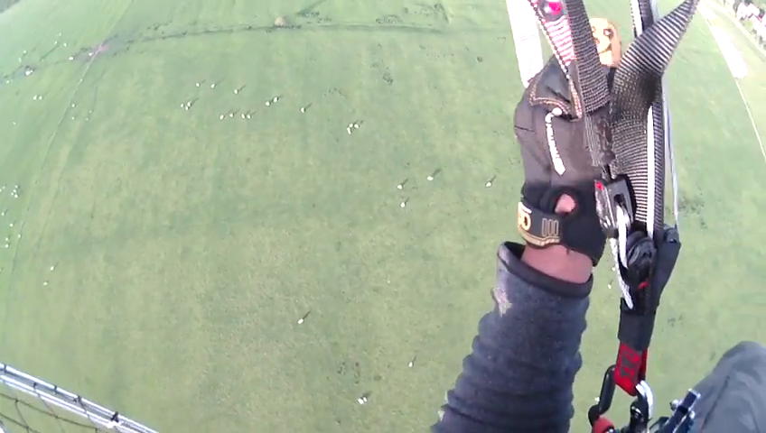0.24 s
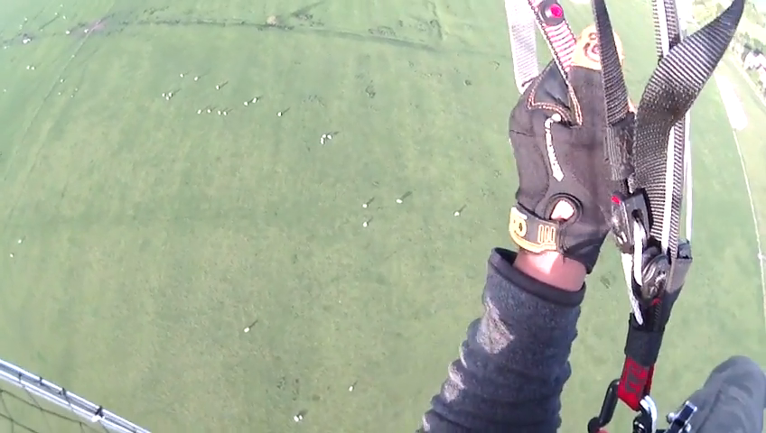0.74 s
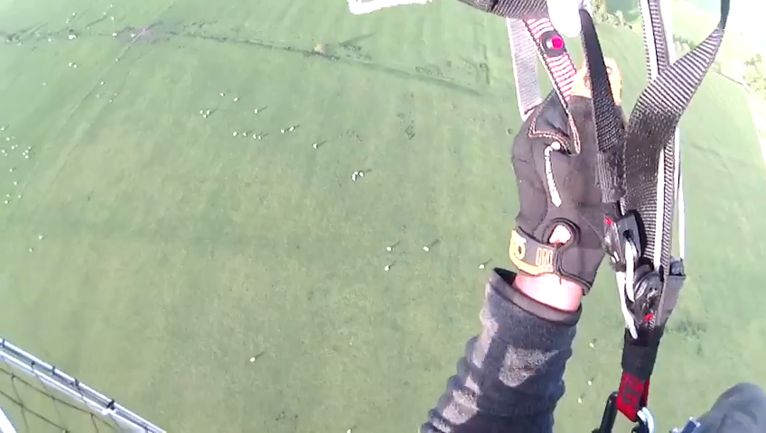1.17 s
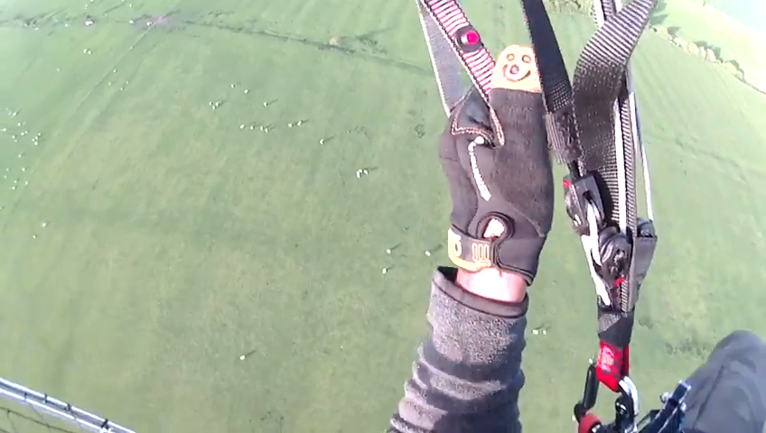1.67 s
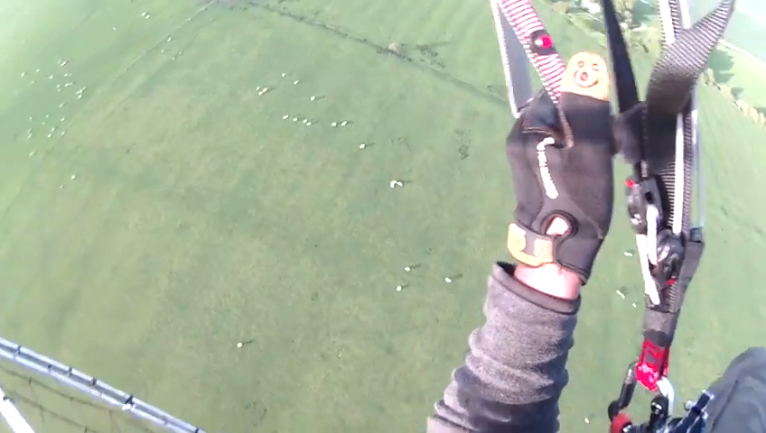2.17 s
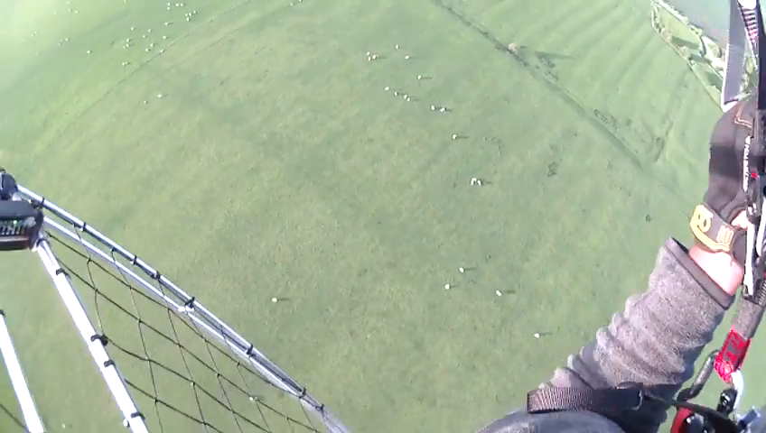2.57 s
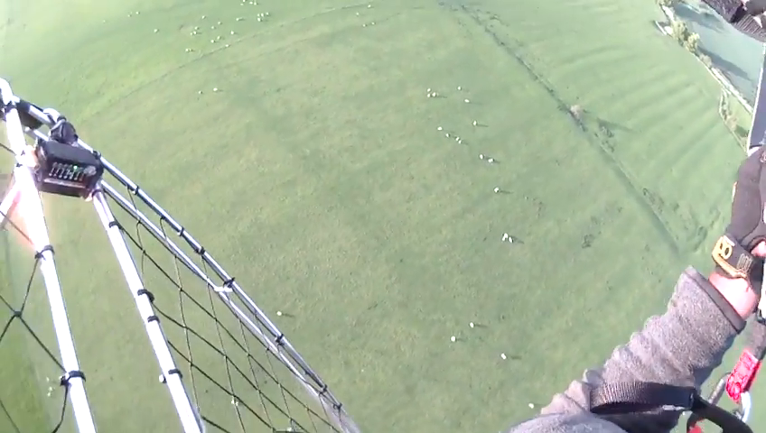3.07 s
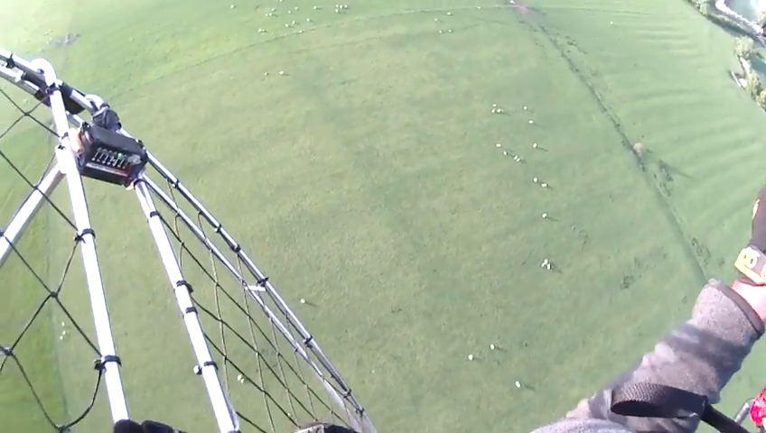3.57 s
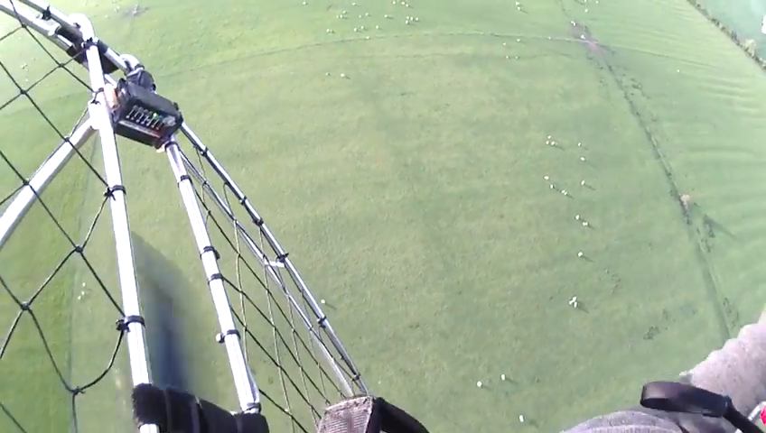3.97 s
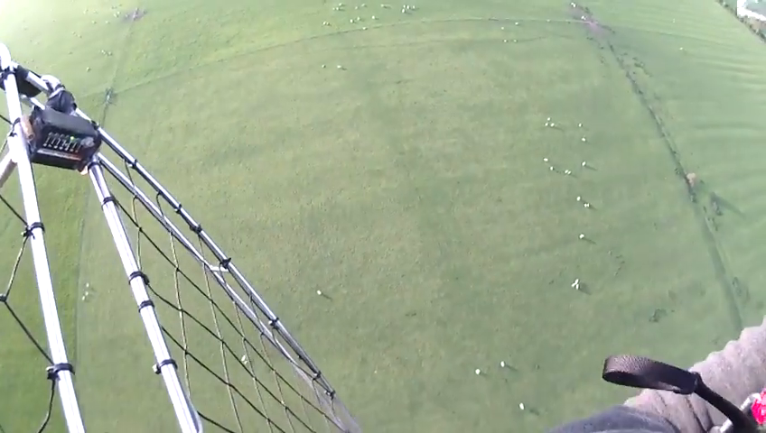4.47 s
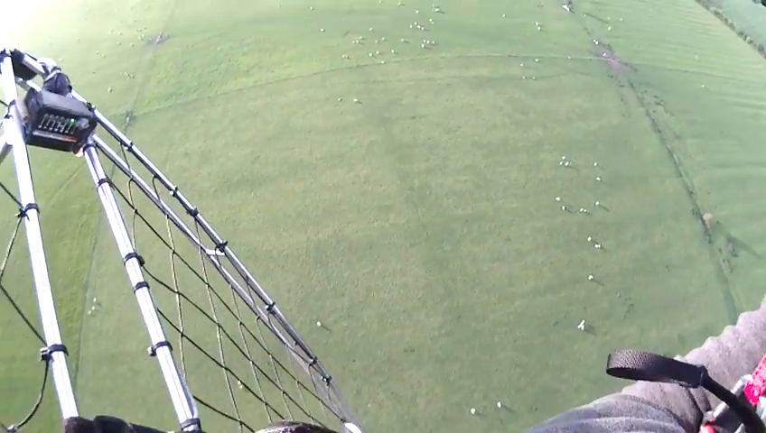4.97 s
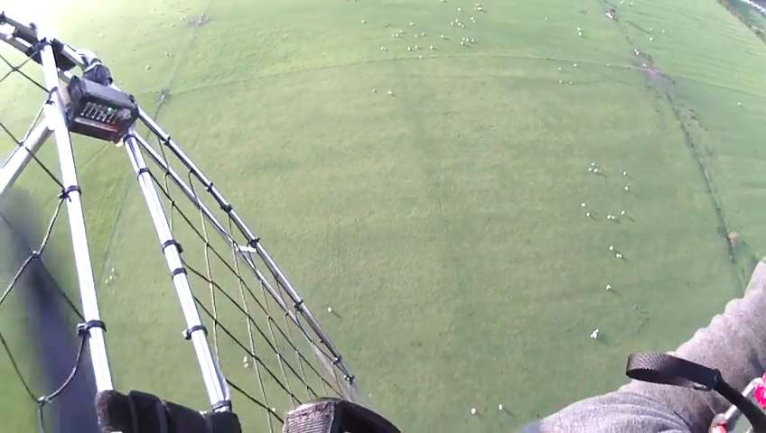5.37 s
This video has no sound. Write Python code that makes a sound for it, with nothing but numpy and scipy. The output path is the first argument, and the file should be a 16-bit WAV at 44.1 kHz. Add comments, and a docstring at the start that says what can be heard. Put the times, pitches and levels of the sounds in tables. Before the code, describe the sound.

Irregular, hollow engine pops with a near-constant high metal ring sputter over a fast throb, propeller wash and soft wind gusts.

```python
"""An idling engine's thin metal whine near 2 kHz and ringing exhaust pops, close up, over a throb and rushing air.
It is a paramotor's two-stroke in a glide: strong firings come two to thirteen turns apart, weaker turns between.
Combustion sets off a metal resonance and rattles the fins; a moment later the exhaust pulse leaves and its pipe rings.
The intake throb is a filtered pulse on every turn; propeller wash and gusts, strongest early, are coloured noise.
A faint treble hiss swells on each turn, and the strongest pops overload the microphone input."""
import sys
import numpy as np
from scipy import signal
from scipy.fft import rfft, irfft, next_fast_len
from scipy.io import wavfile
from scipy.ndimage import uniform_filter1d

SR = 44100
rng = np.random.default_rng(int(sys.argv[2]) if len(sys.argv) > 2 else 0)


def pcm_store(signal):
    """Save signal as 16-bit PCM."""
    levels = np.round(np.clip(np.atleast_2d(signal), -1, 1) * 32767)
    wavfile.write(sys.argv[1], SR, levels.astype(np.int16).T)


N = 247842
TIME = np.arange(N) / SR

# how openly the engine faces the microphone: time_s, bright_metal_gain_db
FACING_CURVE = [(0, -8), (2.2, -13), (2.8, -8), (3.3, 2), (4.0, 2), (4.7, -3.5), (5.6, -1)]
WHINE_LEAD_S = 0.0124   # combustion comes this long before the exhaust blast peaks


def from_db(db):
    """Decibels to gain."""
    return 10 ** (np.asarray(db) / 20)


def rms_one(x):
    """Scales a signal to rms 1."""
    return x / np.sqrt(np.mean(x ** 2) + 1e-20)


def in_time(curve):
    """Reads a curve of (time, value) points at every sample."""
    return np.interp(TIME, *np.transpose(curve))


def colour(x, spectrum):
    """Causal minimum-phase filter through the points of a spectrum, built by folding its cepstrum."""
    size = next_fast_len(len(x) + 8192)
    size += size % 2
    hz, level_db = np.transpose(spectrum)
    log_hz = np.log(np.fft.rfftfreq(size, 1 / SR) + 1)
    gain = from_db(np.interp(log_hz, np.log(hz), level_db))
    cepstrum = irfft(np.log(gain))
    cepstrum[1:size // 2] *= 2
    cepstrum[size // 2 + 1:] = 0
    response = np.exp(rfft(cepstrum))
    return irfft(rfft(x, size) * response)[:len(x)]


def noise(spectrum):
    """Steady coloured noise of rms 1."""
    return rms_one(colour(rng.standard_normal(N), spectrum))


def place(times, sounds):
    """Lays one short sound (a row) at each time; a second of margin at both ends is cut off."""
    out = np.zeros(N + 2 * SR)
    for time_s, sound in zip(times, sounds):
        start = SR + round(time_s * SR)
        out[start:start + len(sound)] += sound
    return out[SR:SR + N]


def swell(rise_s, decay_s):
    """A 0.1 s envelope that builds up and dies away; its top is 1."""
    t = TIME[:SR // 10]
    shape = (1 - np.exp(-(t / rise_s) ** 2)) * np.exp(-t / decay_s)
    return shape / shape.max()


def rings(times, level_db, envelope, hz, spread_hz, phase_scatter_cycles):
    """A resonance set ringing at each time, never at quite the same pitch or phase."""
    pitch, phase = rng.standard_normal((len(times), 2)).T[:, :, None]
    cycles = (hz + spread_hz * pitch) * TIME[:len(envelope)] + phase_scatter_cycles * phase
    tones = np.sin(2 * np.pi * cycles)
    return place(times, from_db(level_db)[:, None] * envelope * tones)


def crank():
    """Every turn's time, blast dB and whine dB: a firing, a spent turn, then misfires or a weak firing."""
    # strong firings: time_s (peak of the exhaust blast), blast_db, whine_db
    firings = [(0.0023, -3, -5.5), (0.0829, -5, -7.5), (0.1261, -5.5, -5), (0.1893, -10.5, -6),
               (0.2254, -3.5, -10), (0.3049, -6.5, -2), (0.388, -3.5, -5), (0.4325, -14, -8.5),
               (0.5994, -6, -7), (0.6627, -4, -7), (0.749, -5.0, -6.5), (0.8144, -6.5, -6.5),
               (0.902, -2.5, -3), (1.0305, -3.5, -4), (1.2568, -2, -6.5), (1.3709, -7.5, -10.5),
               (1.6399, -3, -4.5), (1.7269, -4.5, -6.0), (1.7923, -5.5, -5.5), (1.8585, -5, -4),
               (1.972, -8, -7.0), (2.0359, -6, -5.5), (2.1215, -7, -8), (2.1651, -3.5, -4),
               (2.408, -5.5, -10), (2.4939, -6, -6.5), (2.5367, -7, -7.5), (2.5787, -1.5, -4.5),
               (2.726, -6, -5.5), (2.7688, -9.0, -5.5), (2.8108, -5, -5.5), (2.8738, -5, -4.5),
               (2.9376, -3.0, -2), (3.0029, -8.5, -9.5), (3.0449, -3.5, -5.5), (3.0877, -5, -8.0),
               (3.1302, -4, -6), (3.1729, -13, -6.5), (3.2564, -0.5, -7.5), (3.3786, -7.0, -13),
               (3.482, -2.5, -7), (3.5864, -5, -5.5), (3.6493, -6, -6), (3.7095, -3.0, -6.5),
               (3.8296, -4.0, -9), (3.9316, 0, -6.5), (4.0514, -2, -12.5), (4.1313, -4.5, -7),
               (4.2804, -7, -12.5), (4.4263, -6.5, -14), (4.464, -3, -10.5), (4.5486, -7.5, -16),
               (4.587, -4.5, -6.5), (4.6689, -4.5, -2), (4.75, -2, -5.5), (4.8545, -7.5, -9),
               (4.893, -4.0, -3), (4.9968, -6.5, -7), (5.0385, -3, -4.0), (5.1201, -4, -3.5),
               (5.1616, -1.5, -11), (5.266, -5.5, -6.5), (5.3069, -4.5, -6), (5.37, -4.5, -4),
               (5.4319, -5, -7.5), (5.4947, -5, -5), (5.6179, -1.5, -4.5)]
    turns_per_s = 47.2   # nominal idle; sets how many turns fit between strong firings
    # kinds of turn between strong firings: (blast dB, whine dB)
    spent, misfire, weak_firing = (-17, -19.5), (-14, -12), (-11.5, -10)
    weak_firing_chance = 0.36   # on a turn when the cylinder has cleared
    scatter_db = 1.5

    turns = []
    for this, following in zip(firings, firings[1:]):
        count = max(1, round((following[0] - this[0]) * turns_per_s))
        turns.append(this)
        kind = spent
        for k, time_s in enumerate(np.linspace(this[0], following[0], count + 1)[1:-1]):
            levels_db = np.array(kind) + scatter_db * rng.standard_normal(2)
            turns.append([time_s, *levels_db])
            # choose the next turn; the one before a strong firing only gathers fuel
            catches = rng.random() < weak_firing_chance and k < count - 3
            if kind is weak_firing:
                kind = spent
            else:
                kind = weak_firing if catches else misfire
    return np.array(turns + [firings[-1]]).T


def engine_beat(times, whine_db):
    """The force of combustion through time, one swell per turn; rms 1."""
    blow = swell(rise_s=0.003, decay_s=0.014)
    return rms_one(place(times - WHINE_LEAD_S, from_db(whine_db)[:, None] * blow))


def whine(times, level_db):
    """Combustion drives a metal resonance hard for part of a turn; it then rings on faintly."""
    pitch_hz, gain_db, after_db, drive_s = 1951, -2.5, -7.5, 0.012
    after = from_db(after_db) * swell(rise_s=0.014, decay_s=0.013)
    drive_gate = np.exp(-(TIME[:len(after)] / drive_s) ** 4)
    driven = swell(rise_s=0.003, decay_s=0.05) * drive_gate
    envelope = (driven + after) / (driven + after).max()
    ringing = rings(times - WHINE_LEAD_S, level_db, envelope, pitch_hz,
                    spread_hz=6.4, phase_scatter_cycles=0.99)
    return from_db(gain_db) * ringing


def fins(beat):
    """Rattle surging with each combustion rings the fin and casing modes; bright ones are easily shadowed."""
    # cooling fin and casing resonances: pitch_hz, level_db (rms, before shadowing), width_hz
    modes = [(2020, -56, 9), (2080, -44, 18), (2150, -44, 25), (2860, -51.5, 12), (2992, -56, 14),
             (3020, -53, 25), (3257, -46.5, 15), (3392, -48, 32), (3440, -52, 40), (3530, -52, 40),
             (5190, -60.5, 170), (5580, -63, 30), (6700, -57.5, 270), (10840, -61, 160)]
    facing = from_db(in_time(FACING_CURVE))
    rattle = np.sqrt(beat) * rng.standard_normal(N)
    out = np.zeros(N)
    for hz, level_db, width_hz in modes:
        radius = np.exp(-np.pi * width_hz / SR)   # a wider mode dies away sooner
        poles = [1, -2 * radius * np.cos(2 * np.pi * hz / SR), radius * radius]
        mode = from_db(level_db) * rms_one(signal.lfilter([1, 0, -1], poles, rattle))
        if 2950 < hz < 8000:
            mode = mode * facing
        out = mode - out   # neighbouring modes move in opposite senses
    return out


def exhaust(times, blast_db):
    """A pressure pulse with a slight turbulent tail leaves the silencer; the pipe rings with it."""
    # colour of the pop: frequency_hz, gain_db (relative)
    pop_colour = [(60, -36), (200, -31), (320, -2), (440, 6), (620, 0.5), (740, 3.5), (900, -8),
                  (1100, -8.5), (1400, -2), (2000, -17), (2600, -63), (8000, -71.5)]
    pop_growth = 1.934   # dB of pop per dB of blast: hard firings bark, soft ones only ping
    pop_gain_db, pop_lead_s = 4.0, 0.002243
    pipe_hz, pipe_gain_db, pipe_lead_s = 1582, -0.48, 0.001503

    tail = 0.025 * swell(rise_s=0.0004, decay_s=0.002)
    puffs = tail * rng.standard_normal((len(times), len(tail)))
    puffs[:, 0] += 1   # the pressure pulse itself
    pulses = place(times - pop_lead_s, from_db(pop_growth * blast_db)[:, None] * puffs)
    # divide by the peak that a lone pulse reaches through the colour
    height = np.abs(colour(signal.unit_impulse(len(tail)), pop_colour)).max()
    pops = colour(pulses, pop_colour) / height

    pipe = rings(times - pipe_lead_s, blast_db, swell(rise_s=0.0014, decay_s=0.0028), pipe_hz,
                 spread_hz=47.0, phase_scatter_cycles=0.14)
    return from_db(pop_gain_db) * pops + from_db(pipe_gain_db) * pipe


def throb(times):
    """The intake gulps once a turn, kept even by the flywheel and drawn out into a hum."""
    # colour of the intake: frequency_hz, level_db (relative)
    intake_colour = [(50, -52.5), (140, -35), (190, -29), (240, -2), (290, 5.5), (335, 7.5), (390, 4.5),
                     (550, 0), (660, -5), (730, 7), (820, -3), (1100, -14.5), (1500, -26), (6000, -82)]
    level_db, uneven_db, lead_s = -29, 3.0, 0.009944
    smear_s, smear_hz = 0.05, 302.2   # longest delay; frequency at which it has halved

    steady = np.linspace(times[0], times[-1], len(times))
    drift = times - steady
    for _ in range(2):
        drift = uniform_filter1d(drift, size=7, mode="nearest")
    gulp_db = uneven_db * rng.standard_normal((len(times), 1))
    gulps = place(steady + drift - lead_s, from_db(gulp_db))
    # the lows lag behind the highs: phase is the running sum of delay over frequency
    delay_s = smear_s / (1 + np.fft.rfftfreq(N, 1 / SR) / smear_hz)
    lag_cycles = np.cumsum(delay_s) * SR / N
    drawn_out = irfft(rfft(gulps) * np.exp(-2j * np.pi * lag_cycles), N)
    return from_db(level_db) * rms_one(colour(drawn_out, intake_colour))


def air():
    """Propeller wash as steady coloured noise, and gusts brushing the microphone as noise that comes and goes."""
    # airflow over the microphone: time_s, gust_level_db
    gust_curve = [(0, -22), (0.35, -21.5), (0.55, -15), (0.85, -18.5), (1.08, -19.5), (1.25, -16),
                  (1.5, -22), (1.68, -19), (1.82, -23.5), (1.97, -14.5), (2.25, -24.5), (2.8, -26),
                  (3.4, -33.5), (5.62, -30.5)]
    # noise colours: frequency_hz, level_db (per Hz, relative)
    wash_colour = [(30, -49), (170, -55), (300, -12.5), (420, -3), (630, -3.5), (735, -0.5), (860, -7),
                   (1100, 0), (1260, -8.5), (1550, 9.5), (2050, -6.5), (2450, -24), (3400, -22.5),
                   (9000, -53)]
    gust_colour = [(30, -45), (100, -26), (170, -13.5), (250, -1.5), (340, 6), (450, -2), (600, -8),
                   (1000, -25), (6000, -84.5)]
    wash_db, gust_gain_db = -23.5, -3.0
    gusts = from_db(gust_gain_db + in_time(gust_curve)) * noise(gust_colour)
    return from_db(wash_db) * noise(wash_colour) + gusts


def treble_hiss(beat):
    """A faint treble hiss, coloured noise that swells on each turn."""
    # noise colour: frequency_hz, level_db (per Hz, relative)
    hiss_colour = [(1500, 1), (2600, 13), (3500, 17.5), (3750, 9.5), (5200, 10), (6000, 7), (6800, 8),
                   (8000, 2), (10200, -1.5), (11200, 5.5), (15000, 5), (16000, 10)]
    level_db, shadow = -41.5, 0.086   # shadow: dB of hiss per dB of facing
    swelling = rms_one(0.35 + 0.65 * beat)
    gain = from_db(level_db + shadow * in_time(FACING_CURVE))
    return gain * swelling * noise(hiss_colour)


def scene():
    """Engine, air and treble hiss, as heard from the harness, in one channel."""
    times, blast_db, whine_db = crank()
    beat = engine_beat(times, whine_db)
    engine = whine(times, whine_db) + fins(beat) + exhaust(times, blast_db) + throb(times)
    return (engine + air() + treble_hiss(beat))[None]


def record(dry):
    """The strongest pops overload the input and are flattened; a steep low-pass cuts the top."""
    ceiling, hardness, cutoff_hz = 0.705, 45, 15820
    flattened = dry / (1 + np.abs(dry / ceiling) ** hardness) ** (1 / hardness)
    low_pass = signal.ellip(12, 0.1, 90, cutoff_hz, fs=SR, output="sos")
    return signal.sosfilt(low_pass, flattened)


dry = scene()
out = record(dry)
pcm_store(out)
```